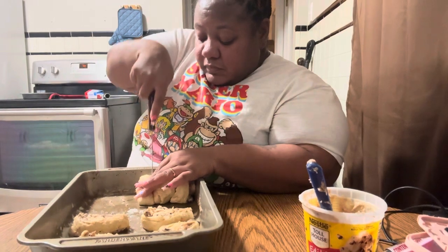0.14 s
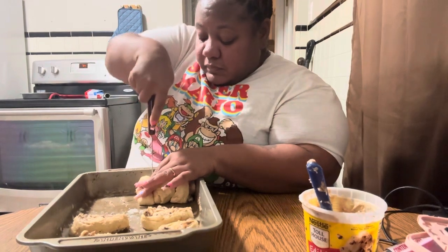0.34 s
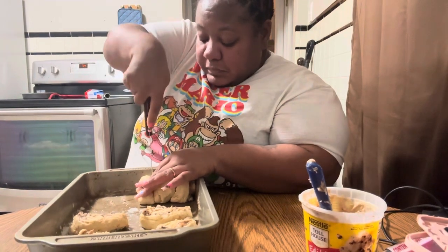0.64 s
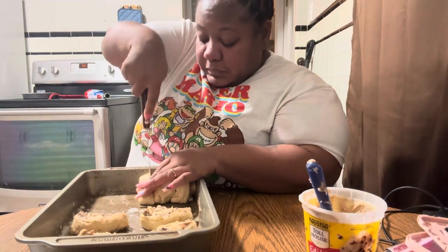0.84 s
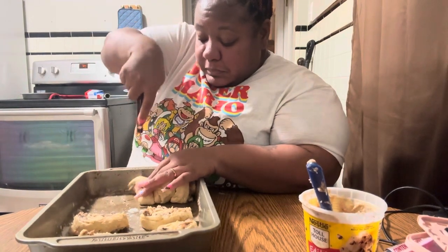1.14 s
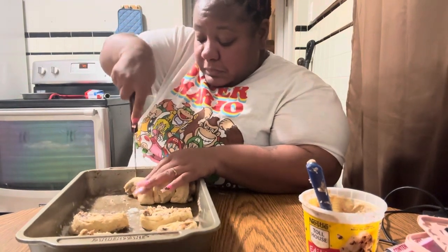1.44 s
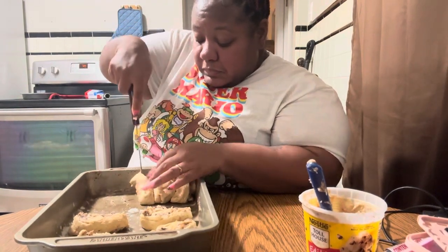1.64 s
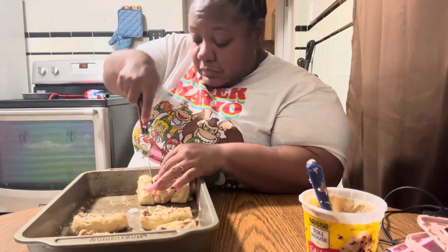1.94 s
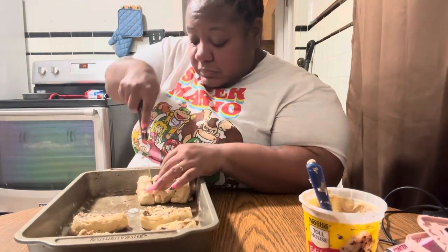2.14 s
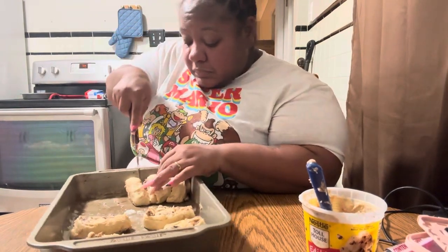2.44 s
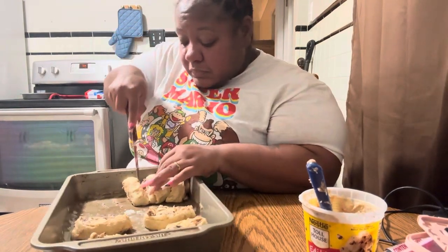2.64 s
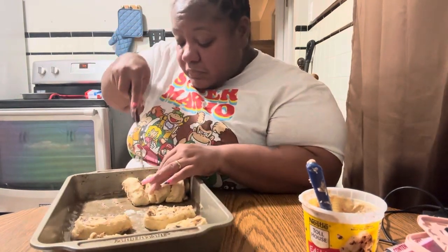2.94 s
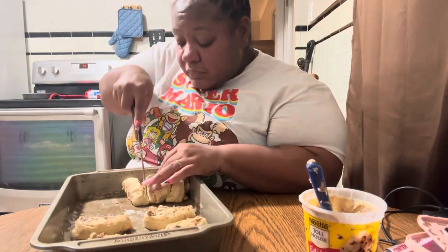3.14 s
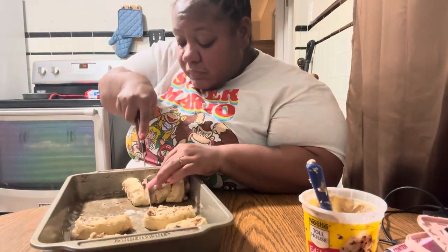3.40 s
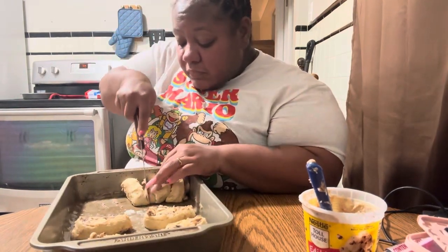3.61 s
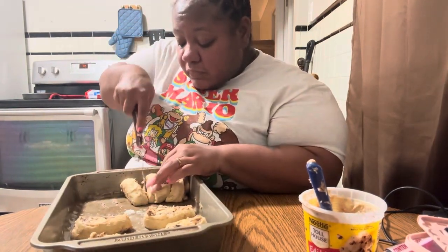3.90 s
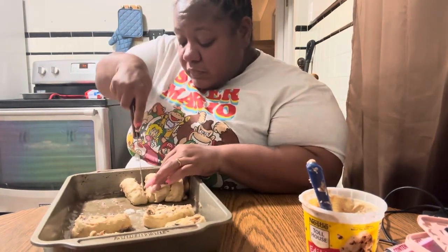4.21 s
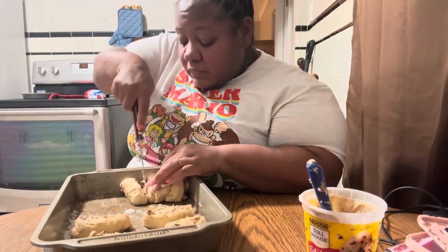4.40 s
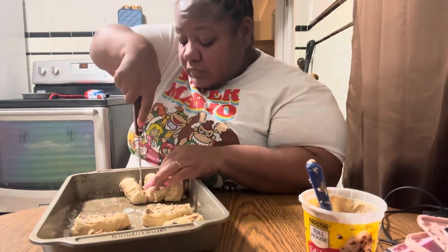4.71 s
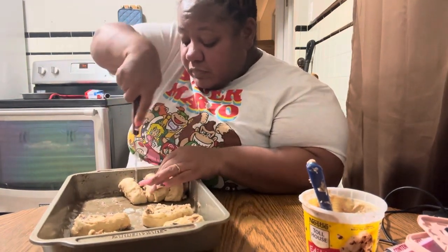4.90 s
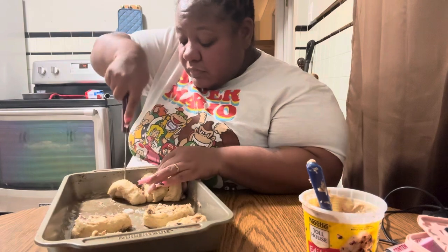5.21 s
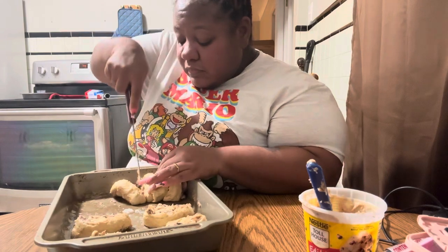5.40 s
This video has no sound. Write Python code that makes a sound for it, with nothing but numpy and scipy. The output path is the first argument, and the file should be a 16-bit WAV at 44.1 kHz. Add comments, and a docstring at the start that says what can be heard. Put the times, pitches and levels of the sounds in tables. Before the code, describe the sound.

Close stereo sound of a knife sawing soft dough in a metal pan on a wooden table. Five heavy, booming knocks with scrapes come in the first second or so, then a quiet gap with faint rubbing. From about three seconds, lighter knocks, squeaks and sharp clacks return, and the last strokes fade. A small kitchen adds short echoes over low hum.

```python
"""A knife knocks on the floor of a metal baking pan on a wooden table as it saws through soft dough.
Each knock booms and thuds in the table modes, rings the damped pan, clatters and ticks at the edge.
Between knocks, clumped slips of the blade scrape, rub and squeak; dough hisses and lets go with dry ticks.
A small kitchen answers with noise echoes over air rumble and motor hum; two close microphone ports listen."""
import sys
import numpy as np
from scipy import signal
from scipy.fft import rfft, irfft
from scipy.io import wavfile

SR = 44100
rng = np.random.default_rng(int(sys.argv[2]) if len(sys.argv) > 2 else 0)


def materialize(psi):
    """Save the field psi as 16-bit PCM at rate SR to the path in sys.argv[1].

    A 1-D psi becomes a single channel; in a 2-D psi each row is a channel.
    """
    bounded = np.clip(np.atleast_2d(psi).T, -1, 1)
    quanta = np.round(bounded * 32767).astype(np.int16)
    wavfile.write(sys.argv[1], SR, quanta)


N = 244745

# Air rumble spectrum, before scaling to the level below: pitch_hz, relative_level_db (per Hz)
AIR_SPECTRUM = [(20, -39.5), (30, -35), (45, -21), (65, -23), (100, -11), (130, -14), (200, -8), (255, -7),
                (295, -4), (420, -10), (480, -15.5), (900, -22.5), (1330, -32), (4370, -58.5),
                (9000, -58.5), (13000, -63.5), (16000, -74)]
AIR_DB = -49.5
# Motor hums: pitch_hz, waver_width_hz, waver_level_db, steady_level_db
HUMS = [(54, 6.0, -58, -68), (80, 4.0, -57, -53), (119, 1.0, -75, -65), (156.1, 1.0, -75, -61)]

# Left-right likeness of diffuse sound: pitch_hz, likeness (-1 to 1)
DIFFUSE_LIKENESS = [(60, 0.82), (180, 0.78), (350, 0.65), (640, 0.062), (1400, -0.29), (3100, -0.09),
                    (5000, 0.29), (6800, -.8), (9800, -0.32), (11300, -0.67), (16000, .9)]
# Lean of diffuse sound: pitch_hz, left_minus_right_db
DIFFUSE_LEAN = [(60, -2), (180, -3), (550, -6), (1650, 0), (4970, -0.5), (15000, -1)]
# Kitchen decay: pitch_hz, t60_s
KITCHEN_DECAY = [(50, 0.12), (250, 0.38), (1000, 0.4), (4000, 0.4), (13000, 0.22)]
# Kitchen strength: pitch_hz, echo_energy_db (relative to the direct sound)
KITCHEN_LEVEL = [(50, 5), (250, -10.5), (1000, -7.5), (4000, -1), (13000, -6)]
# Near sources at the ports: pitch_hz, left_minus_right_db
PORT_LEVEL = [(60, -15), (99, -0.5), (160, -6.5), (270, -10), (450, -8), (740, -7), (1220, 2.5), (2010, 1),
              (3330, -0.5), (5500, 4.5), (9080, 6), (15000, -5.5)]
# Near sources at the ports: pitch_hz, left_lead_rad
PORT_PHASE = [(20, 0), (450, .1), (700, 1.4), (1030, 2.0), (1600, 1.1), (2330, -.8), (2900, -1.6),
              (4220, -1.1), (5000, -2.2), (6800, -3.1), (9800, -2.4), (11200, -.1), (16400, -.1)]

# Sticky dough letting go of steel or fingers: start_s, level_db (before colouring)
DOUGH_TACKS = [(.467, -63), (1.434, -69), (1.512, -63), (2.438, -66), (2.668, -74), (2.685, -47.5),
               (5.128, -68.5), (5.24, -70.5)]
# Tack colour: pitch_hz, relative_level_db (per Hz)
TACK_SPECTRUM = [(2500, -44), (5000, -18.5), (7000, 1), (9000, -5.5), (11000, -9.5), (14500, -5.5),
                 (16200, -11.5), (16600, -47)]
TACK_T60_S, TACK_TAIL_T60_S, TACK_TAIL_DB = 0.0061, 0.15, -17.5

# Short rough tones, among them squeaks of the blade as it catches; one leads just into the knock at 4.485 s:
# start_s, peak_level_db, pitch_hz, run_length_s
ROUGH_TONES = [(0.486, -48.5, 1314, .014), (0.876, -41.5, 1330, 0.046), (1.08, -40, 1570, .04),
               (1.107, -48, 3870, .03), (1.135, -49.5, 3900, .03), (1.105, -32.5, 1524, 0.029),
               (1.145, -32.5, 1425, .035), (1.133, -46, 2430, 0.02), (1.142, -49, 3220, .025),
               (1.17, -47, 1530, .04), (1.424, -58, 1220, .018), (1.473, -43.5, 1320, 0.019),
               (3.412, -44.5, 1810, 0.033), (3.611, -42, 1840, 0.014), (3.636, -49, 1840, 0.016),
               (3.717, -36.5, 1840, 0.022), (3.755, -41, 1810, 0.011), (3.81, -39.5, 1257, 0.0061),
               (3.928, -38.5, 1900, 0.03), (3.943, -32.5, 1277, 0.016), (4.066, -33.5, 1910, 0.042),
               (4.084, -28, 1340, .018), (4.469, -28, 1895, 0.019), (4.91, -37, 1454, 0.047),
               (4.964, -44, 1420, 0.015)]

# Blade strokes: loudest_from_s, scrape_level_db, swell_s, hold_s, fade_s,
# rub_above_scrape_db, hiss_above_scrape_db
BLADE_STROKES = [(.0, -55, .02, 0.024, .03, 3.5, -20), (0.496, -58, 0.059, 0.017, 0.033, 5.5, -11),
                 (0.612, -47.5, 0.045, 0.024, 0.055, 5, -12), (0.82, -56, 0.053, 0.0091, 0.11, 9, -7.5),
                 (0.89, -49, .01, 0.037, 0.073, -10, -22), (1.095, -43, .04, 0.057, 0.12, 0, -14),
                 (1.485, -61.5, 0.068, .01, 0.036, 9, -25), (2.238, -71, 0.057, 0.19, 0.025, 4.5, -8.5),
                 (2.734, -69.5, 0.076, 0.083, 0.11, 2.5, -24), (3.022, -57.5, .012, 0.026, 0.079, 2, -10),
                 (3.42, -54.5, .012, 0.026, 0.044, 5, -11), (3.599, -53.5, 0.014, 0.068, 0.055, 6.5, -15),
                 (3.731, -50.5, 0.011, 0.0036, 0.036, -6, -21), (3.769, -54, 0.032, 0.011, .12, 10.5, -6),
                 (3.935, -46.5, 0.019, 0.029, 0.037, 8, -13),
                 (4.092, -42.5, 0.059, 0.0071, 0.097, 3.5, -11),
                 (4.319, -52.5, 0.024, 0.014, 0.089, 9.5, -17.5),
                 (4.455, -47.5, 0.074, 0.012, 0.046, 7.5, -10), (4.778, -44, 0.018, 0.041, 0.076, 2.5, 0.5),
                 (4.919, -47.5, 0.083, 0.027, 0.086, 2, -20), (5.193, -64.5, 0.009, 0.0051, 0.023, 10, -20)]
SWELL_DB = 20  # level change over one swell or fade time
# Scrape resonances of the pan: pitch_hz, width_hz, relative_level_db
SCRAPE_PEAKS = [(1188, 14, 7), (1560, 180, -3.5), (1772, 37, 5.5), (1960, 24, -4.5), (2550, 86, -8.5),
                (2700, 180, -34), (3280, 570, -19.5), (1780, 1130, -6.5)]
# Low rub resonances: pitch_hz, width_hz, relative_level_db
RUB_PEAKS = [(470, 230, -3.5), (630, 164, 2), (790, 188, -0.5)]
# Dough hiss colour: pitch_hz, relative_level_db (per Hz)
HISS_SPECTRUM = [(1760, -15.5), (3000, -7.5), (3390, -15.5), (3880, -15.5), (4140, -15.5), (6910, -15),
                 (8200, -18), (15100, -36.5), (16200, -32), (16500, -63)]

# Knocks: start_s, thud_blow_db, pan_ring_blow_db, pan_smack_blow_db, hardness_db_per_octave, edge_tick_db
PAN_KNOCKS = [(.031, -11.5, -21, -17.5, -4.5, -29), (.233, -11.5, -19.5, -15.5, -4.5, -39.5),
              (.628, -9, -12, -10.5, -3.5, -30.5), (.924, -18, -19, -19.5, -2, -26),
              (.929, -8.5, -13, -13, -2.5, -26.5), (1.168, -20.5, -35, -33, -0.5, -39.5),
              (1.461, -68, -50, -41.5, -4.5, -70), (2.020, -41, -46, -43.5, -4, -82),
              (3.303, -25.5, -26, -29, -3.5, -24.5), (3.326, -36, -36, -34, -17, -84),
              (3.423, -47.5, -48.5, -49, -14, -63), (3.571, -33, -32.5, -29, 1.8, -62),
              (3.592, -45.5, -38.5, -45.5, -13, -79), (4.137, -26.5, -16.5, -12, 8.5, -19),
              (4.15, -33, -22, -24, -13.5, -40), (4.2, -29.5, -40.5, -34.5, 8.5, -42.5),
              (4.323, -37.5, -37.5, -37, -2.5, -62), (4.485, -34, -15.5, -7, 2, -18),
              (4.507, -38.5, -27, -31, 2, -57.5), (4.77, -53, -37.5, -38.5, 4.5, -40),
              (4.791, -27, -36, -42.5, 6, -45), (4.978, -55, -47.5, -41.5, 3.5, -62.5),
              (5.192, -50, -46, -40.5, 2, -63.5)]
# Whole-table boom modes: pitch_hz, relative_level_db, t60_s
BOOM_MODES = [(40, -27, 0.19), (61.6, -23.5, 0.4), (94.5, -23, 0.16), (139, -10.5, 0.44)]
# Table-top thud modes, before each successive one is weakened: pitch_hz, relative_level_db, t60_s
TABLE_MODES = [(214.4, -12.5, 0.24), (255.3, -5.5, 0.2), (283, -9.5, 0.21), (333.8, -13.5, 0.061),
               (357.7, -11, 0.22), (313, 9, 0.038)]
# Dough-damped pan floor; the last four make the smack:
# pitch_hz, relative_level_db, cycles_to_fall_60_db (capped at 50 in use)
PAN_MODES = [(447, -2.5, 15.5), (491.3, 0, 32.5), (564, -11, 28.5), (594, -9, 42.5), (644, -1.5, 19.5),
             (748, 1.5, 37), (766, 1.5, 44), (900, -3.5, 51), (967, -6, 41.5), (1122, -0.5, 40.5),
             (1232, -5, 42), (1333, -8.5, 44.5), (1480, 0, 53), (1607, -12, 38), (1653, -3, 47.5),
             (1779, -4, 54), (2095, -8.5, 52), (2076, -8.5, 46.5), (2250, -16.5, 53.5), (2940, -16, 55),
             (543.5, 7.5, 5.5), (1471, 5.5, 27.5), (3020, -15.5, 22), (4400, -24, 27)]
# Edge tick colour: pitch_hz, relative_level_db (per Hz)
TICK_SPECTRUM = [(1760, -4), (3000, -13.5), (5500, -11), (7480, -7.5), (9730, -12.5), (11600, -35.5),
                 (13300, -15.5), (15600, -19.5), (16500, -55.5)]
# Loose pan clatter colour: pitch_hz, relative_level_db (per Hz)
CLATTER_SPECTRUM = [(1470, -13), (2500, 0), (2940, -10), (5230, -17), (6600, -11.5), (9660, -27.5),
                    (12700, -23.5), (15600, -34), (16000, -65.5)]
# The whole table moves with the thud; the loose pan clatters with the tick.
BOOM_OVER_THUD_DB, CLATTER_OVER_TICK_DB = 7.5, -16.5
CLATTER_PER_HARDNESS = 0.87  # dB of clatter for each dB per octave of hardness

STOPBAND_HZ = 16823


def from_db(db):
    """Turn decibels into amplitude gain."""
    return 10 ** (np.asarray(db) / 20)


def rms_one(x):
    """Scale a signal to rms 1."""
    return x / np.sqrt(np.mean(x ** 2) + 1e-20)


def at_hz(points, hz):
    """Read a two-column table on a log-frequency axis."""
    table_hz, values = np.array(points).T
    return np.interp(np.log(hz), np.log(table_hz), values)


def coloured(x, spectrum):
    """Filter white noise to a spectrum and scale it to rms 1."""
    hz = np.arange(N // 2 + 1) * SR / N + 1  # +1 keeps the logarithm finite
    return rms_one(irfft(rfft(x) * from_db(at_hz(spectrum, hz)), N))


def dying(clicks, t60):
    """Turn each click into a step that decays by 60 dB in t60 seconds."""
    return signal.lfilter([1], [1, -from_db(-60 / (t60 * SR))], clicks + 1e-18)


def ring(clicks, hz, t60):
    """A damped mode: a unit click starts a decaying sine of height 1."""
    r, w = from_db(-60 / (t60 * SR)), 2 * np.pi * hz / SR
    return signal.lfilter([0, np.sin(w)], [1, -2 * r * np.cos(w), r * r], clicks + 1e-18)


def resonate(x, peaks):
    """Sum parallel resonances with alternating signs and scale to rms 1."""
    out = 0
    for k, (hz, width_hz, db) in enumerate(peaks):
        r = np.exp(-np.pi * width_hz / SR)
        top = [(1 - r * r) / 2, 0, (r * r - 1) / 2]
        bottom = [1, -2 * r * np.cos(2 * np.pi * hz / SR), r * r]
        out = out + (-1) ** k * from_db(db) * signal.lfilter(top, bottom, x)
    return rms_one(out)


def push(x, seconds):
    """A soft contact: force builds and fades as half a sine."""
    size = max(3, round(seconds * SR))
    force = np.sin(np.pi * np.arange(1, size) / size)
    return signal.fftconvolve(x, force / force.sum())[:N]


def diffuse(length):
    """Mix mid and side noise spectra so likeness and lean between ports depend on pitch."""
    hz = np.arange(length // 2 + 1) * SR / length + 1
    mid, side = rfft(rng.standard_normal((2, length)))
    alike = np.clip(at_hz(DIFFUSE_LIKENESS, hz), -1, 1)
    lean = from_db(np.outer([.5, -.5], at_hz(DIFFUSE_LEAN, hz)))
    shared = np.sqrt(1 + alike) * mid
    opposed = np.sqrt(1 - alike) * side * [[1], [-1]]
    return hz, lean * (shared + opposed) / np.sqrt(2)


def background():
    """Air and appliance rumble as noise, with hums of steady sines and wavering narrow noise."""
    hz, noise = diffuse(N)
    out = from_db(AIR_DB) * rms_one(irfft(noise * from_db(at_hz(AIR_SPECTRUM, hz)), N))
    for hum_hz, width_hz, waver_db, steady_db in HUMS:
        waver = rms_one(irfft(noise / (1 + (2 * (hz - hum_hz) / width_hz) ** 2), N))
        sine = np.sqrt(2) * np.sin(2 * np.pi * hum_hz * np.arange(N) / SR)
        steady = sine * from_db([[-1.5], [1.5]])  # right port louder
        out += from_db(waver_db) * waver + from_db(steady_db) * steady
    return out


def kitchen(x):
    """Diffuse echoes: noise starts after the first wall and dies at its own rate in each octave."""
    length = SR // 2
    hz, noise = diffuse(length)
    t, echo = np.arange(length) / SR, 0
    for centre in 40 * 2. ** np.arange(10):
        octave_share = np.cos(np.pi / 2 * np.clip(np.log2(hz / centre), -1, 1)) ** 2
        t60 = at_hz(KITCHEN_DECAY, centre)
        unit_energy = np.sqrt(2 * np.log(1000) / (t60 * SR))
        decay = from_db(at_hz(KITCHEN_LEVEL, centre) - 60 * t / t60) * unit_energy
        echo = echo + irfft(noise * octave_share, length) * decay
    echo = echo * np.clip((t - .006) / .001, 0, 1)  # silent for 6 ms, then a 1 ms rise
    return signal.fftconvolve(echo, x[None], axes=1)[:, :N]


def ports(x):
    """Two ports hear a near source with level and phase offsets that depend on pitch."""
    hz = np.arange(N // 2 + 1) * SR / N + 1
    log_level = np.log(from_db(at_hz(PORT_LEVEL, hz)))
    offset = np.outer([.5, -.5], log_level + 1j * at_hz(PORT_PHASE, hz))
    return irfft(rfft(x) * np.exp(offset), N)


def tacks():
    """Sticky dough lets go with a bright, dry noise tick and a quieter fizz behind it."""
    s, db = np.transpose(DOUGH_TACKS)
    clicks = np.zeros(N)
    clicks[(s * SR).astype(int)] = from_db(db)
    shape = dying(clicks, TACK_T60_S) + from_db(TACK_TAIL_DB) * dying(clicks, TACK_TAIL_T60_S)
    return shape * coloured(rng.standard_normal(N), TACK_SPECTRUM)


def rough_tones():
    """A short filtered run of noise rings at one pitch, making a rough little tone."""
    out = np.zeros(N)
    for s, db, hz, length_s in ROUGH_TONES:
        at, size = round(s * SR), round(length_s * SR)
        slips = rng.standard_normal(SR // 8)[:size] * np.hanning(size)
        slips = np.r_[slips, np.zeros(SR // 20)]  # room to ring out
        tone = ring(ring(slips, hz, 0.025), hz, 0.007)
        out[at:at + len(tone)] += from_db(db) * tone / np.abs(tone).max()
    return out


def strokes():
    """Uneven slips of the blade excite the pan in clumps; dough hisses along the steel."""
    t, level = np.arange(N) / SR, np.zeros((3, N))
    for s, scrape_db, swell, hold, fade, rub_db, hiss_db in BLADE_STROKES:
        near = slice(max(0, round((s - 3 * swell) * SR)), round((s + hold + 3 * fade) * SR))
        away = np.maximum((s - t[near]) / swell, (t[near] - s - hold) / fade).clip(0)
        envelope = from_db(scrape_db - SWELL_DB * away)
        level[:, near] += envelope * from_db([[0], [rub_db], [hiss_db]])
    # The blade grips and lets go: a random curve with 70 points per second.
    grip = np.interp(t, np.arange(600) / 70., rng.standard_normal(600))
    size_db = 3.0 * np.minimum(rng.exponential(1, N), 5) + 3.0 * grip
    sizes = from_db(size_db) * rng.choice([-1, 1], N)
    slips = sizes * (rng.random(N) < 1500 / SR)  # on average 1500 slips per second
    scrape, rub = resonate(slips, SCRAPE_PEAKS), resonate(slips, RUB_PEAKS)
    hiss = coloured(rng.standard_normal(N) + 0.18 * slips, HISS_SPECTRUM)
    return level[0] * scrape + level[1] * rub + level[2] * hiss


def strike(at, shake, modes, blow_db, slope, late_cycles, contact_s, lowest_hz, rattle_db, turn=-1):
    """Strike plate modes: low waves arrive late, loose contact rattles on, radiation stops in the bass."""
    out, luck = np.zeros(N), rng.standard_normal((len(at), len(modes)))
    for k, (hz, db, t60) in enumerate(modes):
        clicks = np.zeros(N)
        # Hardness tilts modes about 700 Hz; luck varies each by 2 dB.
        strength = from_db(blow_db + db + slope * np.log2(hz / 700) + 2 * luck[:, k])
        clicks[at + round(late_cycles * SR / hz)] = turn ** k * strength  # turn sets sign and weakening
        rattle = from_db(rattle_db) * shake * dying(clicks, 0.12)
        out += ring(clicks + rattle, hz, t60)
    highpass = signal.butter(3, lowest_hz, "high", fs=SR, output="sos")
    return signal.sosfilt(highpass, push(out, contact_s))


def knocks():
    """Knocks drive table and pan modes, with noise bursts for the edge tick and the loose pan's clatter."""
    s, thud_db, pan_db, smack_db, hardness, tick_db = np.transpose(PAN_KNOCKS)
    at = (s * SR).astype(int)
    shake = rng.standard_normal(N)
    pan_modes = [(hz, db, min(cycles, 50) / hz) for hz, db, cycles in PAN_MODES]

    boom = strike(at, shake, BOOM_MODES, thud_db + BOOM_OVER_THUD_DB, 0, late_cycles=0.7,
                  contact_s=0.0081, lowest_hz=42.5, rattle_db=-49.0)
    thud = strike(at, shake, TABLE_MODES, thud_db, 0, late_cycles=0.51,
                  contact_s=0.0013, lowest_hz=205, rattle_db=-30, turn=0.87)
    pan_ring = strike(at, shake, pan_modes[:-4], pan_db, hardness, late_cycles=0.32,
                      contact_s=0.00029, lowest_hz=369, rattle_db=-33.5)
    smack = strike(at, shake, pan_modes[-4:], smack_db, hardness, late_cycles=0.29,
                   contact_s=0.0003, lowest_hz=380, rattle_db=-30.5)

    edge, loose = np.zeros((2, N))
    edge[at] = from_db(tick_db)
    loose[at] = from_db(tick_db + CLATTER_OVER_TICK_DB + CLATTER_PER_HARDNESS * hardness)
    tick = push(dying(edge, .014), .002) * coloured(rng.standard_normal(N), TICK_SPECTRUM)
    clatter = push(dying(loose, 0.23), 0.0063) * coloured(rng.standard_normal(N), CLATTER_SPECTRUM)
    return boom + thud + pan_ring + smack + clatter, tick


def scene():
    """Knife and pan, near and in the room, over the background; the thin edge tick is heard only directly."""
    body, tick = knocks()
    knife = body + strokes() + rough_tones() + tacks()
    return background() + kitchen(knife) + ports(knife + tick)


def record(dry):
    """Round the peaks with a tanh curve, then cut the top steeply."""
    rounded = .97 * np.tanh(dry / .97)
    lowpass = signal.cheby2(16, 70, STOPBAND_HZ, fs=SR, output="sos")
    return signal.sosfilt(lowpass, rounded)


dry = scene()
out = record(dry)
materialize(out)
```